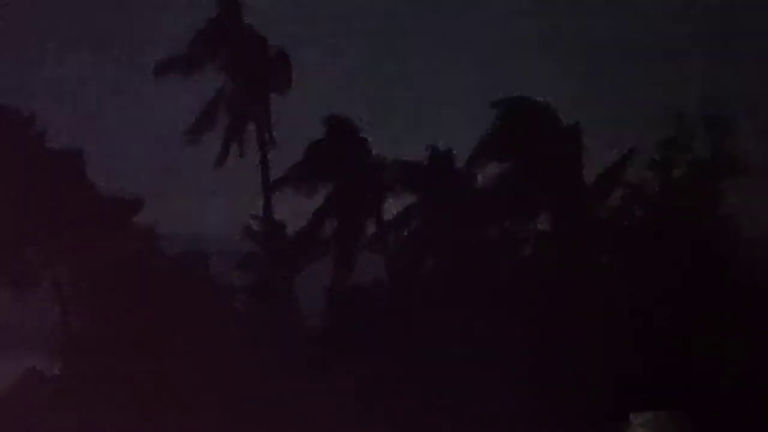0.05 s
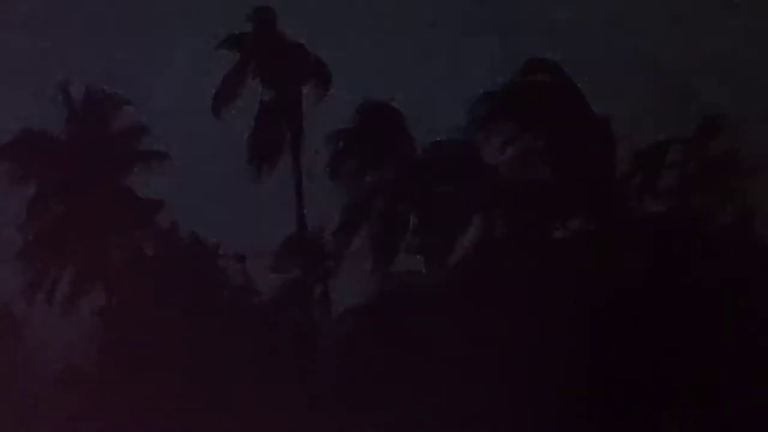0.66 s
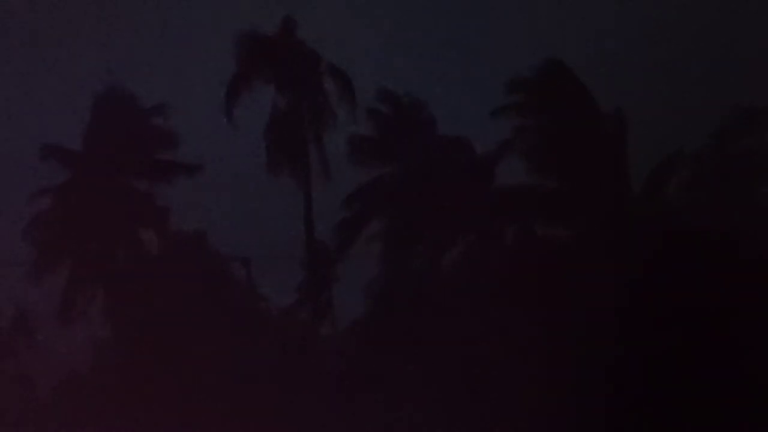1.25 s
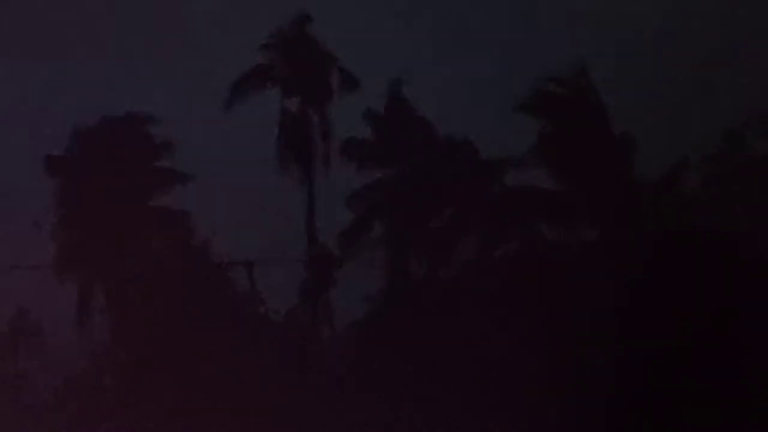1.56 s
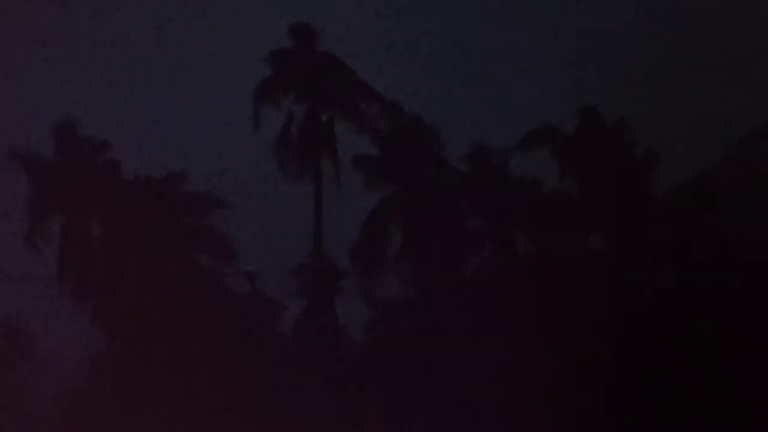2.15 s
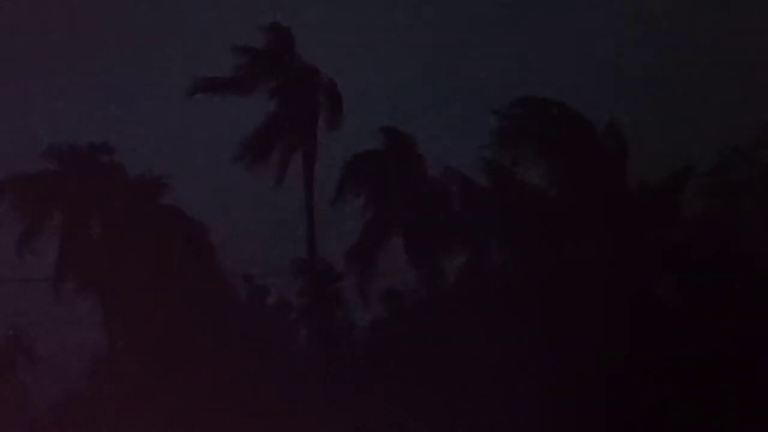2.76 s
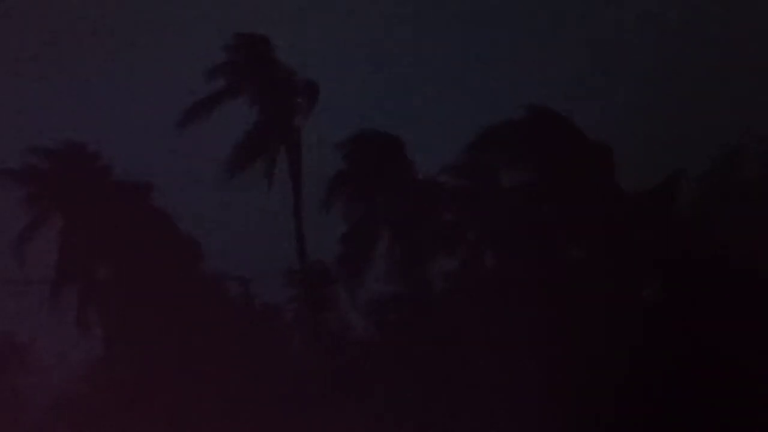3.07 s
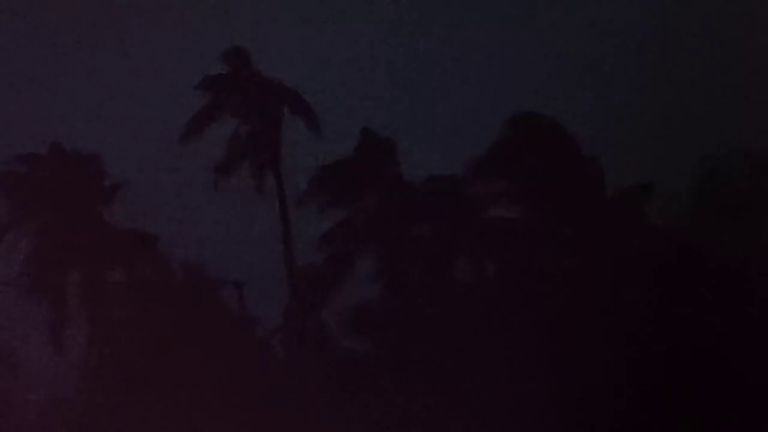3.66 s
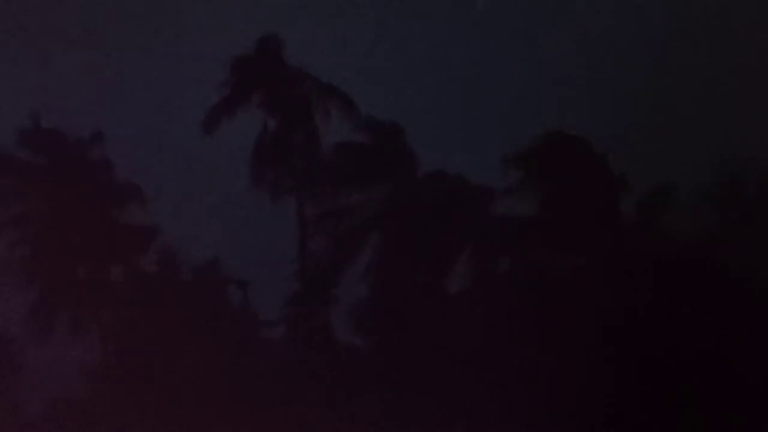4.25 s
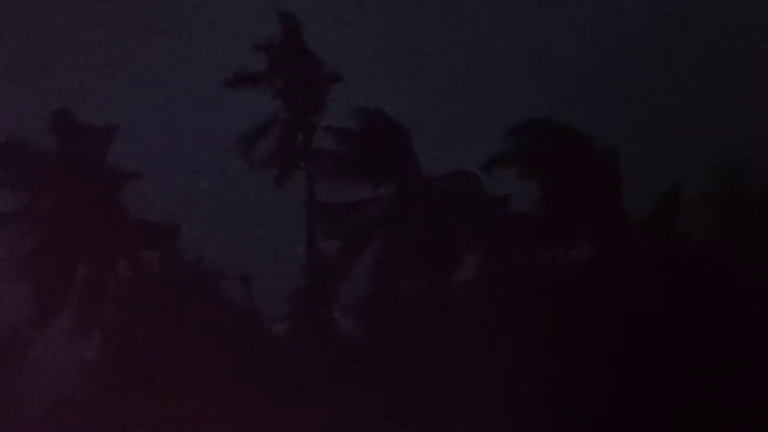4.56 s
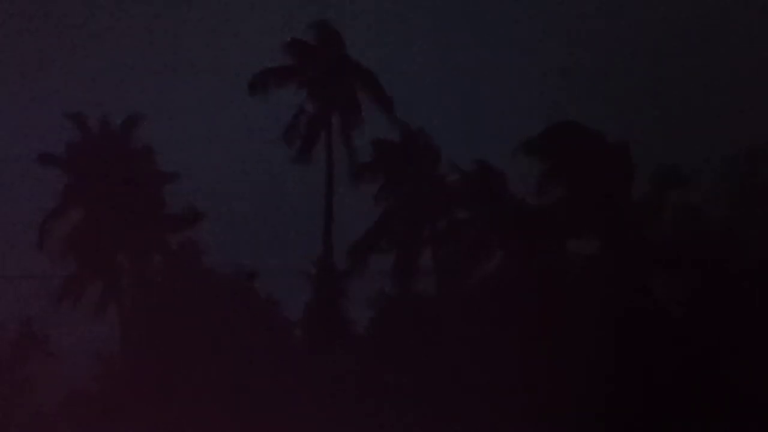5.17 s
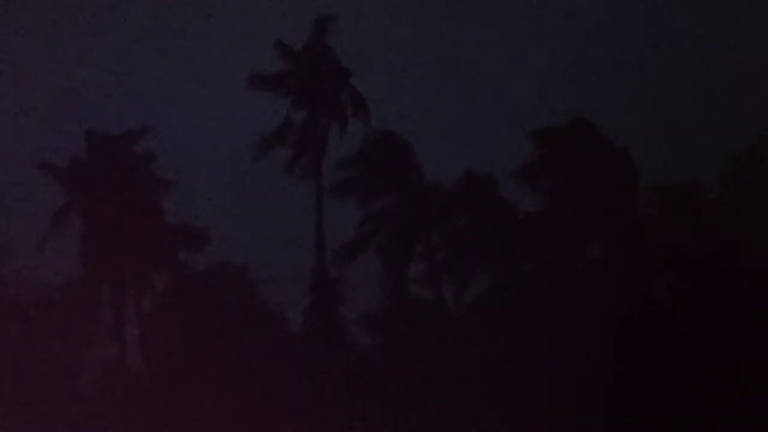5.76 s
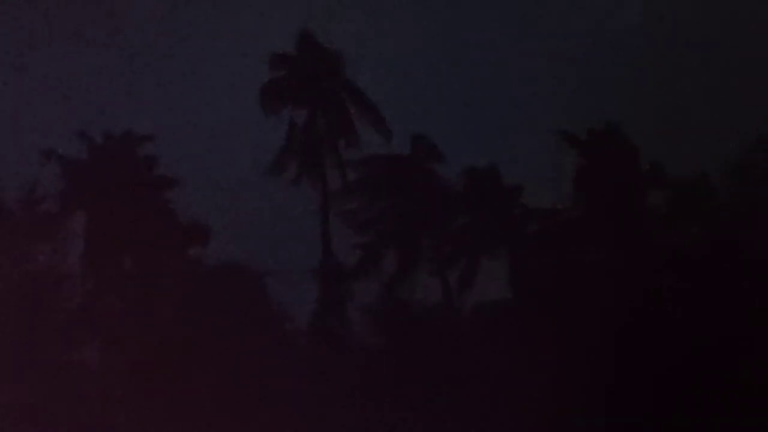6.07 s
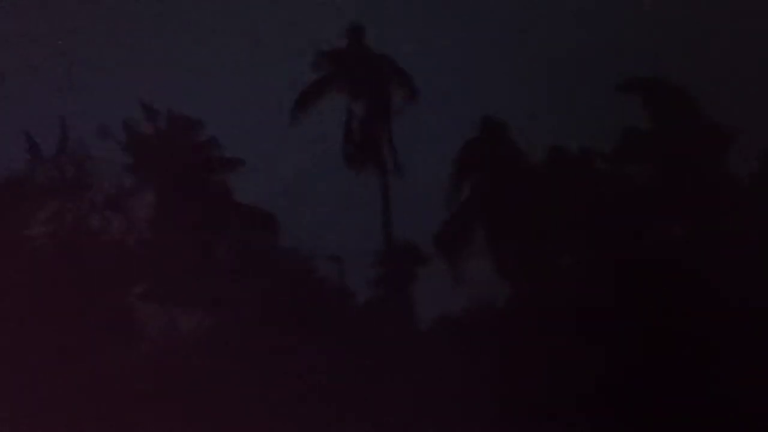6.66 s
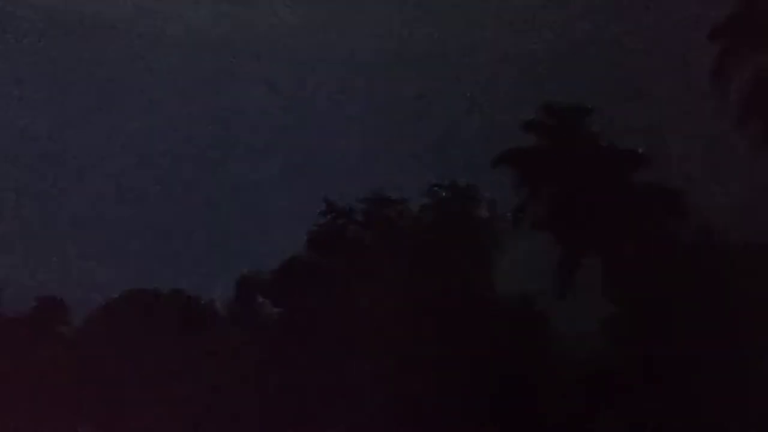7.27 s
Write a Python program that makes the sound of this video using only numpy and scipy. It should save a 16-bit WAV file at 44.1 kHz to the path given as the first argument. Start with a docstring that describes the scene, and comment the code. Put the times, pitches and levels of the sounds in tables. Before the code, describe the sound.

Storm wind hits an outdoor microphone in uneven, rumbling gusts, starting lightly and growing into heavy thumping and fluttering. After a short lull comes one hard, higher blast, then the palm fronds swell in another gap before more thumping gusts arrive. Throughout, the leaves keep up a bright, rushing hiss, with the dull, faint roar of far trees underneath.

```python
"""Storm gusts buffet one microphone: the faster the air, the louder and higher its rumble.
Eddies thump on the port, singly or in fluttering trains.
Behind them, palm fronds hiss, steady and bright, over the faint roar of far trees.
A limiter pulls everything down under the heaviest blows."""
import sys
import numpy as np
from scipy import signal
from scipy.fft import rfft, irfft, next_fast_len
from scipy.io import wavfile
from scipy.ndimage import uniform_filter1d, map_coordinates

SR = 44100
rng = np.random.default_rng(int(sys.argv[2]) if len(sys.argv) > 2 else 0)


def transcribe(signal):
    """Save signal, clipped to [-1, 1], as a 16-bit WAV file at the path in sys.argv[1]."""
    frames = np.atleast_2d(signal).T
    limited = np.clip(frames, -1, 1)
    pcm = np.round(limited * 32767).astype(np.int16)
    wavfile.write(sys.argv[1], SR, pcm)


N = 327222
TIME = np.arange(N) / SR
REFERENCE_DB = -20  # pressure level at nominal air speed


def amp(db):
    """Decibels to gain."""
    return 10 ** (np.asarray(db) / 20)


def unit(x):
    """x at rms 1."""
    return x / np.sqrt(np.mean(x ** 2) + 1e-20)


def wobble(rate_hz):
    """Smooth random curve, rate_hz knots a second."""
    return map_coordinates(rng.standard_normal(int(N * rate_hz / SR) + 4), [TIME * rate_hz])


def coloured(x, spectrum):
    """x shaped by (Hz, dB) points on a log axis, at rms 1."""
    size = next_fast_len(len(x) + 8192)
    hz, db = np.transpose(spectrum)
    grid_hz = np.fft.rfftfreq(size, 1 / SR)
    gain = amp(np.interp(np.log(grid_hz + 1), np.log(hz), db, right=-120))
    return unit(irfft(rfft(x, size) * gain, size)[:len(x)])


def patchy_noise(depth_db):
    """White noise whose bands swell and fade independently."""
    bands = signal.stft(rng.standard_normal(N), nperseg=512)[2]
    patches = uniform_filter1d(rng.standard_normal(bands.shape), size=8, axis=0)
    patches = uniform_filter1d(patches, size=20, axis=1)
    return unit(signal.istft(bands * amp(depth_db * unit(patches)), nperseg=512)[1][:N])


def leaf_ticks(count, spread):
    """Leaflets slap together: many tiny impulses, a few stronger."""
    at = (rng.random(count) * N).astype(int)
    sizes = np.exp(spread * rng.standard_normal(count))
    signs = rng.choice([-1, 1], count)
    return unit(np.bincount(at, sizes * signs, N))


def fronds(tick_gain=0.32, flutter_db=0.46):
    """Air rushes through the near crowns; their leaflets patter."""
    # Wind in the crowns. Each row: time in seconds, hiss level in dB.
    hiss_levels = [(0,-32),(1.85,-35.2),(2.9,-33),(3.8,-34),(4.3,-29.7),(4.89,-32.5),(4.97,-28),(5.27,-26),(5.65,-29),(6.55,-29.5),(7.2,-33),(7.4,-31.5)]
    # Frond hiss as coloured by the microphone, which resonates near 6.5 kHz.
    # Each row: frequency in Hz, relative density in dB.
    hiss_through_mic = [(300, -46), (900, -21.5), (1700, -18), (2300, -13), (3000, -15.5), (3600, -12),
                        (4250, -9.5), (4900, -12.5), (5800, -5.5), (6550, 1.5), (7350, -6.5), (7700, -14.5),
                        (8000, -28), (8400, -39.5)]
    rustle = patchy_noise(depth_db=0.2) + tick_gain * leaf_ticks(count=9000, spread=0.8)
    level_db = np.interp(TIME, *np.transpose(hiss_levels)) + flutter_db * wobble(15)
    return amp(level_db) * coloured(rustle, hiss_through_mic)


def far_roar(level_db=-38.0, swell_db=0.1):
    """Wind in distant trees, dull and even."""
    # Roar spectrum. Each row: frequency in Hz, relative density in dB.
    roar_spectrum = [(15,-4),(60,3),(150,1.5),(320,-2),(600,-7.5),(1100,-9),(1700,-9.5),(2450,-9),(3000,-14),(5000,-13),(8000,-42)]
    return amp(level_db + swell_db * wobble(8.4)) * coloured(patchy_noise(depth_db=1.0), roar_spectrum)


def gust_flow(lull_db=-53, skirt_db=-14, skirt_octaves=-0.7):
    """Gusts rise, crest and fall in a skirt of weaker, coarser air. Returns power, fineness in octaves."""
    # Gusts at the port. Each row: arrival in seconds, hold in seconds, level in dB,
    # whirl fineness in octaves up.
    gusts = [(0.52,0.032,-33.5,0.01),(.85,0.49,-28.5,-0.005),(1.429,0.33,-21.5,-0.0024),(1.948,.08,-19.5,-.15),(2.17,.44,-16,-0.19),(2.751,.15,-22,-.05),(3.06,.14,-21.5,0.0017),(3.349,.12,-22.5,0),(3.71,.06,-17,-.3),(4.53,.37,-16,.52),(5.575,.05,-23.5,-.3),(5.91,0.63,-23,0),(6.7,.25,-39,0),(7.108,0.32,-24,0.03)]
    crest_db_per_s, edge_db_per_s, skirt_db_per_s = 6, 240, 62
    power, weighted_octaves = np.full(N, amp(lull_db) ** 2), np.zeros(N)
    for arrival_s, hold_s, db, octaves in gusts:
        from_middle_s = np.abs(TIME - arrival_s - hold_s / 2)
        outside_s = np.maximum(0, from_middle_s - hold_s / 2)
        edge_db = edge_db_per_s / (1 + hold_s / 0.6) * outside_s  # longer gusts have softer edges
        core = amp(db - crest_db_per_s * from_middle_s - edge_db) ** 2
        skirt = amp(db + skirt_db - skirt_db_per_s * outside_s) ** 2
        power += core + skirt
        weighted_octaves += octaves * core + skirt_octaves * skirt
    return power, weighted_octaves / power


def buffeting(strikes, lump_db=2.5, steady_db=-15, jerk_db=1.295, eddy_octaves=0.2, trim_db=0.76):
    """A frozen turbulence pattern sweeps past the port: faster air plays it louder and higher."""
    # Port pressure spectrum at nominal speed. Each row: frequency in Hz, relative density in dB.
    turbulence = [(4, -31), (10, 0.5), (40, 0.5), (130, -1.5), (300, -6.5), (480, -14), (1000, -27),
                  (1600, -48), (3000, -67), (6000, -89)]
    swells = eddy_power(strikes)
    flow, gust_octaves = gust_flow()
    # small eddies make the flow lumpy; half as much at steady_db
    lumps = amp(lump_db * wobble(70) / (1 + flow / amp(steady_db) ** 2))
    power = flow * lumps ** 2 + swells
    pressure = np.sqrt(power)
    octaves = gust_octaves + eddy_octaves * swells / power  # finer whirls inside an eddy
    # dynamic pressure goes roughly as speed squared
    speed = (pressure / amp(REFERENCE_DB)) ** 0.52 * amp(jerk_db * wobble(160))
    pattern = coloured(rng.standard_normal(2 * N), turbulence)
    energy = uniform_filter1d(uniform_filter1d(pattern ** 2, size=600), size=600)
    pattern = unit(pattern / (np.abs(energy) + 1e-6) ** 0.055)  # evens neighbouring whirls slightly
    travel = np.cumsum(speed * 2 ** octaves)
    return amp(trim_db) * pressure * map_coordinates(pattern, [travel], order=3, mode="wrap")


def eddies(shedding_s=0.0317, scatter_s=0.002, scatter_db=1.18):
    """Eddies shed near-periodically. Returns (time in s, peak in dB, half length in s) for each."""
    # Hard eddies striking the port, alone or in trains. Each row: first strike in seconds, count,
    # peak level in dB, half length in seconds.
    trains = [(.855,2,-24,0.0088),(1.489,1,-15,0.0049),(1.638,1,-12.5,.008),(1.747,1,-14.5,0.0086),(1.956,3,-12.5,.005),(2.168,1,-11.5,0.0074),(2.219,12,-12,.006),(2.795,1,-14.5,.006),(2.848,1,-13.5,.004),(3.072,3,-18.5,.008),(3.169,3,-12,.005),(3.336,1,-17.5,0.0076),(3.573,1,-14,0.0073),(3.83,1,-19.5,0.0066),(4.513,1,-11.5,0.0058),(4.75,1,-13,.013),(5.975,1,-15.5,.008),(6.036,1,-12.5,.015),(6.076,1,-13,0.0051),(6.149,2,-12,0.0082),(6.274,1,-16,.018),(6.336,1,-16.5,0.017),(6.622,1,-22,.008),(7.111,2,-22.5,.006),(7.21,1,-21,0.015)]
    strikes = []
    for first_s, count, db, half_s in trains:
        for k in range(round(count)):
            late, louder = rng.standard_normal(2) * (k > 0)
            at_s = first_s + k * shedding_s + scatter_s * late
            strikes.append((at_s, db + scatter_db * louder, half_s))
    return strikes


def eddy_power(strikes):
    """Each eddy is a brief Gaussian swell of the flow."""
    power = np.zeros(N)
    for at_s, db, half_s in strikes:
        near = slice(max(0, int((at_s - 4 * half_s) * SR)), int((at_s + 4 * half_s) * SR))
        power[near] += amp(db) ** 2 * np.exp(-((TIME[near] - at_s) / half_s) ** 2)
    return power


def eddy_slaps(strikes, boost_db=6.0):
    """An eddy's core hits the port: steep push, slower rebound. Harder hits are steeper."""
    out, t = np.zeros(N + SR), np.arange(SR // 20) / SR
    for at_s, db, _ in strikes:
        tau_s = 0.0017 / amp(db - REFERENCE_DB) ** 0.5
        age = t / tau_s
        push = age * (2 - age) * np.exp(-age)
        out[int(at_s * SR):][:len(t)] += amp(db + boost_db) * push / push.max()
    return out[:N]


def limiter(x, threshold_db=-14.0, recovery_db_per_s=78, ceiling=0.42):
    """Gain drops on loud stretches and climbs back steadily; remaining peaks are soft-clipped."""
    level_db = 10 * np.log10(np.abs(uniform_filter1d(x ** 2, size=330)) + 1e-12)
    over_db = np.maximum(0, level_db - threshold_db)
    climb_db = recovery_db_per_s * TIME
    gain_db = climb_db - np.maximum.accumulate(over_db + climb_db)
    held = x * amp(uniform_filter1d(gain_db, size=130))
    return held / (1 + (held / ceiling) ** 6) ** (1 / 6)


def scene():
    """Trees near and far, plus wind on the microphone; mono."""
    strikes = eddies()
    return (fronds() + far_roar() + buffeting(strikes) + eddy_slaps(strikes))[None]


def record(dry):
    """Limiter, then a brick-wall low-pass."""
    top_hz = 8500
    size = next_fast_len(N + 8192)
    passband = np.fft.rfftfreq(size, 1 / SR) < top_hz
    return irfft(rfft(limiter(dry[0]), size) * passband, size)[None, :N]


dry = scene()
out = record(dry)
transcribe(out)
```